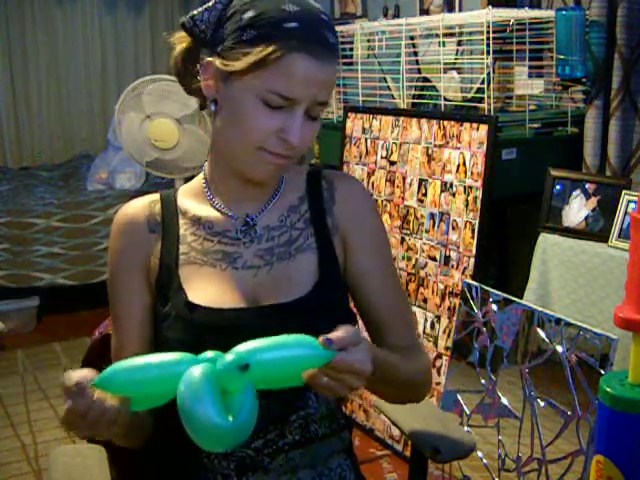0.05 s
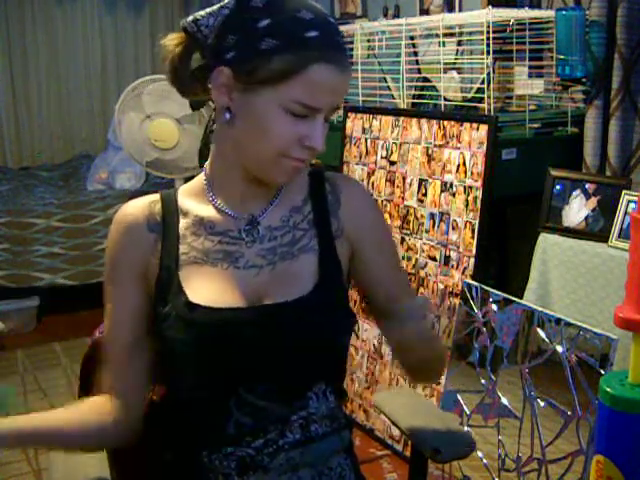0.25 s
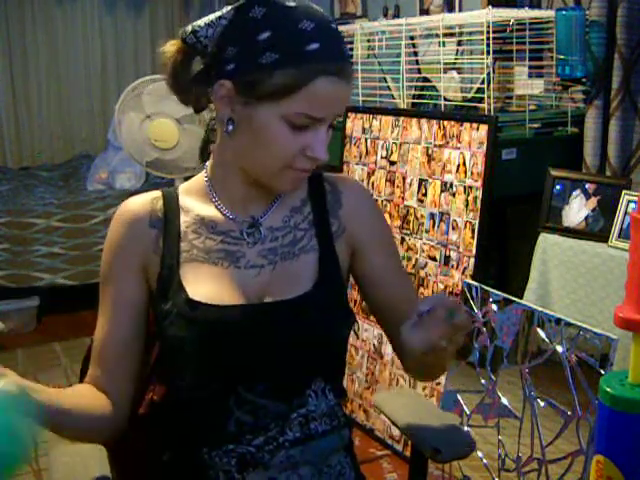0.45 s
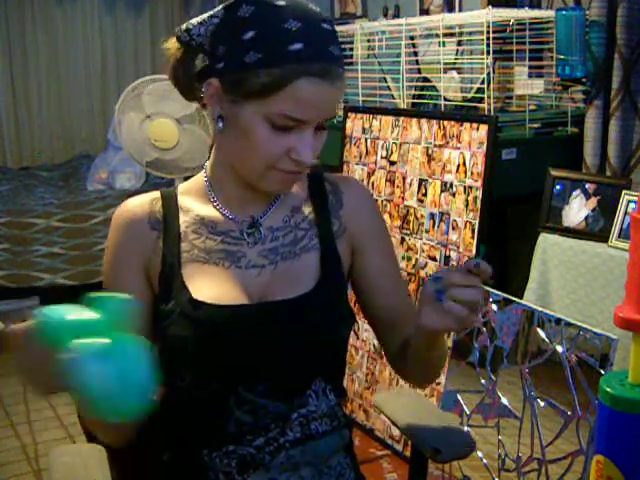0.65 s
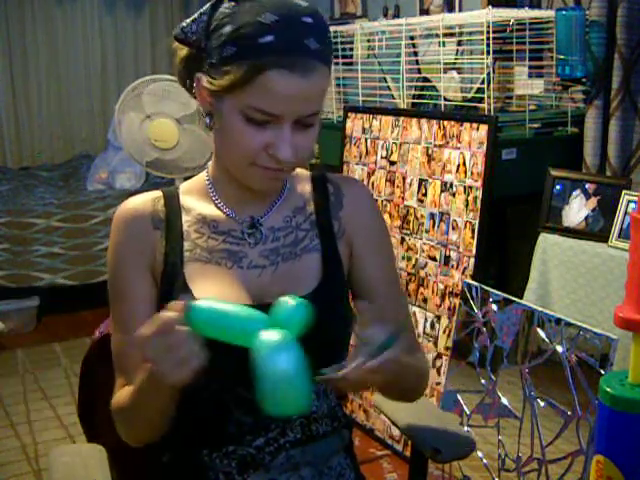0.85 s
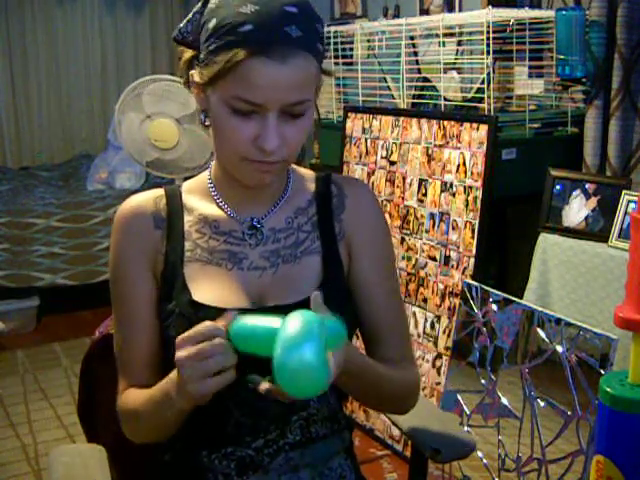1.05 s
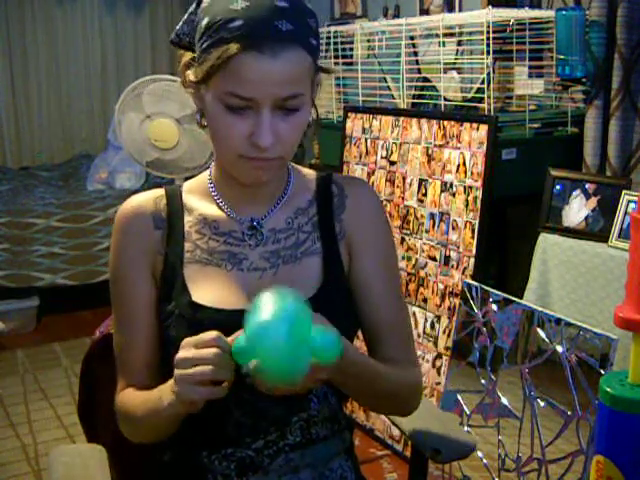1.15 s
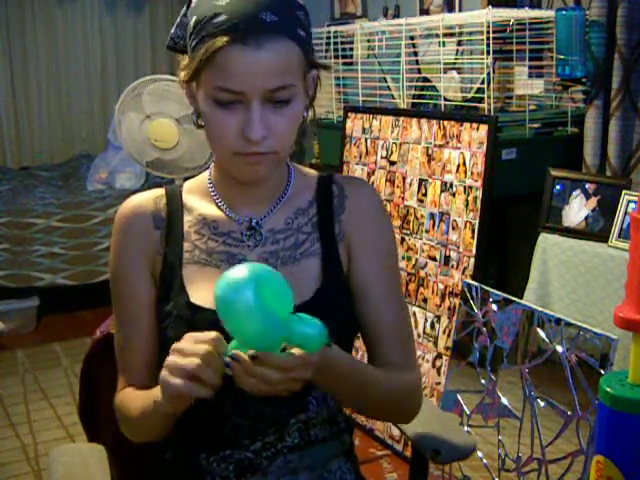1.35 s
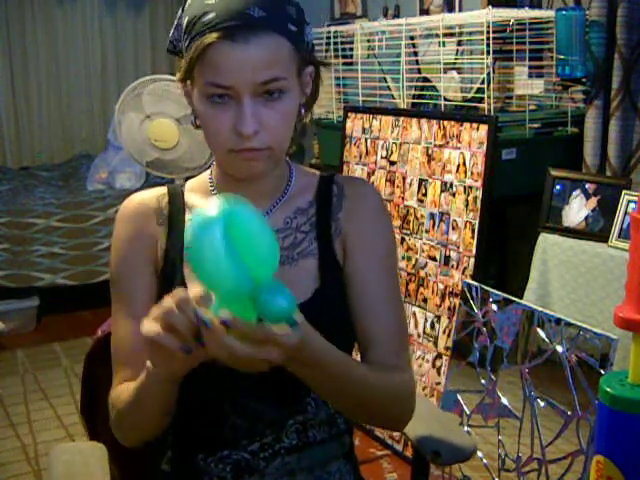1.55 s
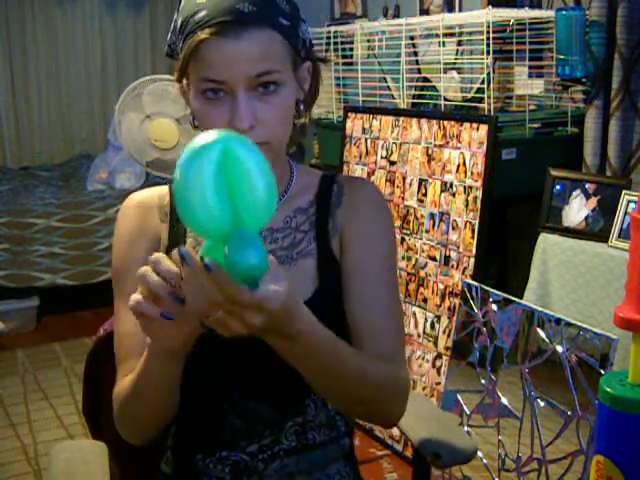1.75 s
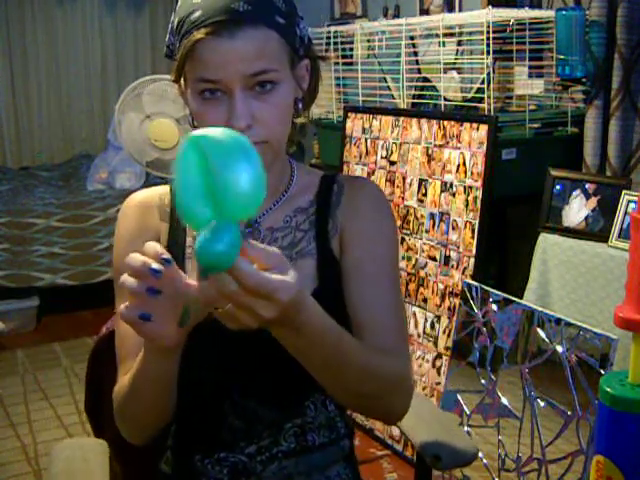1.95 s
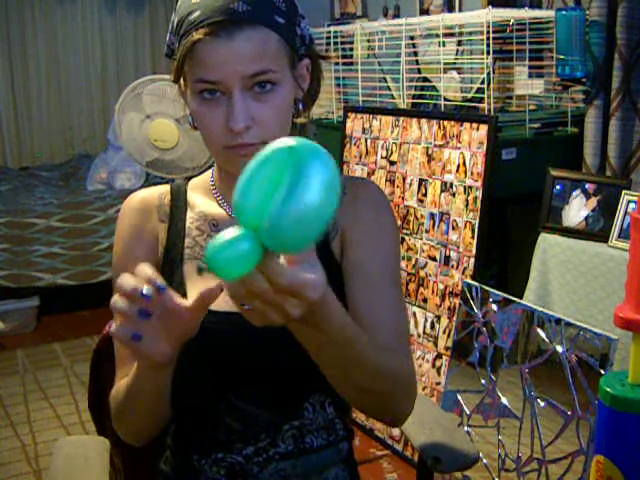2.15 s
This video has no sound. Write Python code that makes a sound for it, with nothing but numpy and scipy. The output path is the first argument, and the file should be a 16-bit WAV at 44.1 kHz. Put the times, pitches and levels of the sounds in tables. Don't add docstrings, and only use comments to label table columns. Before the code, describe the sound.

Loud balloon pop after a brief rubbery creak, then faint ticks, soft pats and a short squeak

```python
import sys
import numpy as np
from scipy import signal
from scipy.fft import rfft, irfft
from scipy.io import wavfile
from scipy.ndimage import uniform_filter1d

SR = 44100
rng = np.random.default_rng(int(sys.argv[2]) if len(sys.argv) > 2 else 0)


def store_wav(level_fs):
    pcm = np.round(np.clip(np.atleast_2d(level_fs), -1, 1) * 32767)
    wavfile.write(sys.argv[1], SR, pcm.T.astype(np.int16))


def decibels_to_gain(level_db):
    exponent = np.asarray(level_db, float) / 20
    return 10 ** exponent


N = 97020
EVENT_LEN = 9000


def level(x, db):
    return x * decibels_to_gain(db) / np.sqrt(np.mean(x ** 2))


def curve(table, col, outside=None):
    rows = np.array(table)
    return np.interp(np.arange(N) / SR, rows[:, 0], rows[:, col], left=outside, right=outside)


def across(table, hz):
    rows = np.array(table)
    return np.interp(np.log(hz), np.log(rows[:, 0]), rows[:, 1])


def walk(rate_hz):
    k = int(SR / rate_hz)
    steps = np.repeat(rng.standard_normal(N // k + 1), k)
    return 1.3 * uniform_filter1d(uniform_filter1d(steps, k), k)[:N]


def fade(t60_s, size=EVENT_LEN):
    return np.exp(-np.log(1000) * np.arange(size) / SR / t60_s)


def add(track, s, x):
    i = int(s * SR)
    track[i:i + len(x)] += x[:N - i]


def ring(hz, t60_s, sag_per_s=0):
    t = np.arange(EVENT_LEN) / SR
    cycles = hz * np.cumsum(1 / (1 + sag_per_s * t)) / SR
    return fade(t60_s) * np.sin(2 * np.pi * cycles)


def steep(noise, hz, width_hz):
    edges_hz = [hz - width_hz / 2, hz + width_hz / 2]
    shape = signal.butter(2, edges_hz, "band", fs=SR, output="sos")
    return level(signal.sosfilt(shape, noise), 0)


def floor():
    # f/Hz, density/dB
    fan = [(15, -11.5), (25, 1), (65, -7), (129, -16), (506, -11), (1690, -23), (2300, -22), (4600, -27.5)]
    # t/s, lift over the floor/dB
    rustle = [(.6, 1), (.85, -0.5), (.95, -0.5), (1.15, 1), (1.4, 0.25), (1.55, 3.5), (1.7, 0), (1.8, 6.5),
              (2.0, -0.5)]
    # t/s, level/dB
    settle = [(0, 3.5), (.3, 3), (.65, -8), (.9, 1.5), (1.7, -3), (2.0, 4.5), (2.2, 5.5)]
    fan_db, hum_hz, hum_db = -49.5, 59, -54.5
    lift_db, low_db = curve(rustle, 1), curve(settle, 1)
    wash = 0
    for hz in 22 * 2 ** np.arange(0, 7.9, 1 / 3):
        db = across(fan, hz) + 0.87 * walk(4) + lift_db * min(hz / 400, 1) + low_db * (hz < 110)
        wash = wash + steep(rng.standard_normal(N), hz, hz / 4) * decibels_to_gain(db) * np.sqrt(hz)
    hum = np.sin(2 * np.pi * hum_hz * np.arange(N) / SR)
    return level(wash, fan_db) + hum * decibels_to_gain(hum_db + low_db + 1.5 * walk(5.5))


def room():
    # f/Hz, density/dB
    colour = [(40, -33.5), (110, -18.5), (300, -12.5), (700, 0.5), (1100, -9), (1500, -10), (2250, -8.5),
              (3600, -15.5)]
    # f/Hz, t60/s
    decay = [(100, .24), (300, 0.14), (700, 0.24), (1500, 0.18), (2500, 0.19), (4000, 0.2)]
    size, tail = 20000, 0
    for hz in 50 * 2 ** np.arange(0, 6.6, 1 / 3):
        noise = steep(rng.standard_normal(size), hz, hz / 4)
        tail = tail + noise * decibels_to_gain(across(colour, hz)) * np.sqrt(hz) * fade(across(decay, hz), size)
    return tail / np.sqrt(np.sum(tail ** 2))


def creak():
    # t/s, level/dB
    pull = [
        (0, -36.5),
        (.06, -37),
        (.13, -35.5),
        (.195, -32.5),
        (.215, -35),
        (.227, -36.5),
        (.24, -39.5),
    ]
    # f/Hz, width/Hz, level/dB
    modes = [(156, 60, -5), (540, 280, 4), (900, 400, -5), (1450, 500, -11), (2250, 700, -6),
             (3100, 600, -9.5), (3650, 400, -12)]
    slips_per_s, scatter_db = 2500, 2
    slips = (rng.random(N) < slips_per_s / SR) * rng.standard_normal(N)
    body = sum(decibels_to_gain(db + scatter_db * walk(64)) * steep(slips, hz, width_hz) for hz, width_hz, db in modes)
    hiss = decibels_to_gain(-12) * steep(slips, 3800, 4200)
    return level(body + hiss, 0) * decibels_to_gain(curve(pull, 1, -92.5))


def ticks():
    # t/s, peak/dB, pitch f/Hz
    snaps = [(.4578, -21, 2800), (.464, -29, 2600), (.4775, -21, 3100), (.484, -32, 2600),
             (.5385, -30, 3200), (.588, -27, 2800), (.594, -37, 2600), (1.645, -43, 2200),
             (1.772, -38, 3100), (1.774, -33, 2000), (1.814, -29, 3300), (1.8165, -25, 2100),
             (1.818, -26, 3800)]
    t60_s, rise_s, gain = .0065, .003, 2.4
    width_hz, tail_gain, tail_t60_s = 1900, 0.07, 0.078
    out = np.zeros(N)
    for s, db, hz in snaps:
        snap = ring(hz, t60_s) * (1 - fade(rise_s))
        tail = steep(rng.standard_normal(EVENT_LEN), hz, width_hz) * fade(tail_t60_s)
        add(out, s, decibels_to_gain(db) * (gain * snap + tail_gain * tail))
    return out


def pats():
    # t/s, peak/dB, pitch f/Hz
    touches = [(.9395, -29.5, 360), (0.947, -34, 260), (.955, -27.5, 470), (.962, -41, 390),
               (.977, -42.5, 780), (1.0135, -29.5, 260), (1.032, -32.5, 298), (1.062, -42, 496),
               (1.552, -36.5, 620), (1.772, -28.5, 748), (1.82, -22.5, 748), (1.847, -32.5, 120)]
    t60_s, rise_s, skin_db = 0.012, 0.0029, -19
    out = np.zeros(N)
    for s, db, hz in touches:
        noise = rng.standard_normal((2, EVENT_LEN))
        hollow = ring(hz, t60_s) + 0.24 * steep(noise[0], 0.95 * hz, hz) * fade(0.077)
        skin = decibels_to_gain(skin_db) * steep(noise[1], 2800, 2200) * fade(0.055)
        add(out, s, decibels_to_gain(db) * (1 - fade(rise_s)) * (1.52 * hollow + skin))
    return out


def squeak():
    # t/s, level/dB, slip rate f/Hz
    rub = [
        (1.828, -40, 1104),
        (1.838, -25, 1116),
        (1.85, -15.5, 1089),
        (1.855, -25.5, 1055),
        (1.871, -25, 978),
        (1.883, -21.5, 1068),
        (1.897, -20, 1154),
        (1.903, -32.5, 1181),
        (1.93, -36, 1210),
    ]
    # multiple of slip rate, start level/dB, end level/dB
    partials = [(.5, -9.5, -35), (1, -0.5, -2), (2, -6, 4), (3, -8.5, 2.5)]
    jitter, flutter_db, rasp_db = .04, 2.5, 2.5
    bite, bite_from_db = .5, -18
    phase = 2 * np.pi * np.cumsum(curve(rub, 2) * (1 + jitter * walk(300))) / SR
    start_s, end_s = rub[0][0], rub[-2][0]
    along = np.clip((np.arange(N) / SR - start_s) / (end_s - start_s), 0, 1) ** 2
    press_db = curve(rub, 1) - bite_from_db
    tone = 0
    for k, start_db, end_db in partials:
        db = start_db + (end_db - start_db) * along
        db = db + max(k - 1, 0) * bite * press_db + flutter_db * walk(150)
        tone = tone + decibels_to_gain(db) * np.sin(k * phase)
    rasp = steep(rng.standard_normal(N), 4400, 4400) * decibels_to_gain(rasp_db + walk(200))
    low_rasp = decibels_to_gain(-8) * steep(rng.standard_normal(N), 754, 760)
    return (tone + 0.41 * rasp + low_rasp) * decibels_to_gain(curve(rub, 1, -70))


def bursts():
    # t/s, level/dB, ring f/Hz, ring t60/s, crack/dB
    chambers = [
        (.2392, 17.5, 653.7, 0.057, -22),
        (.2705, 11.5, 726.6, .05, -11.5),
        (.2772, -1, 615, .04, 9),
        (.287, -2.5, 648, .04, 1),
        (.302, 4, 752, 0.051, -6.5),
    ]
    crack_hz, crack_width_hz, crack_t60_s = 2780, 2800, 0.037
    thump_hz, thump_db, sag_per_s = 158.5, -21, 23.7
    boom_hz, boom_width_hz, boom_db = 569, 525, -10
    slap_db, boom_room_db = 6, -17
    out, slap = np.zeros(N), np.zeros(N)
    for s, db, hz, t60_s, crack_db in chambers:
        noise = rng.standard_normal((2, EVENT_LEN))
        crack = steep(noise[0], crack_hz, crack_width_hz) * fade(crack_t60_s)
        boom = steep(noise[1], boom_hz, boom_width_hz) * fade(1.7 * t60_s)
        air = ring(hz, t60_s, sag_per_s) + decibels_to_gain(thump_db) * ring(thump_hz, .08)
        add(out, s, decibels_to_gain(db) * (decibels_to_gain(boom_db) * boom - air + decibels_to_gain(crack_db) * crack))
        flat_slap = decibels_to_gain(crack_db + slap_db) * noise[0] * fade(0.005)
        add(slap, s, decibels_to_gain(db) * (flat_slap + decibels_to_gain(boom_room_db + boom_db) * boom))
    return out, slap


def scene():
    tick_wet_db, hand_wet_db = -19, -13.5
    pop, slap = bursts()
    snaps, hands, echo = ticks(), pats() + squeak(), room()
    bright = signal.lfilter([1, -.9], [1], echo)
    bright = bright / np.sqrt(np.sum(bright ** 2))
    send = decibels_to_gain(tick_wet_db) * snaps + decibels_to_gain(hand_wet_db) * hands
    wet = signal.fftconvolve(slap, echo)[:N] + signal.fftconvolve(send, bright)[:N]
    return (pop + snaps + hands + wet + creak() + floor())[None]


def roll_off(x):
    return signal.sosfilt(signal.butter(12, 16470, fs=SR, output="sos"), x)


def record(dry):
    # f/Hz, gain/dB
    passband = [(20, -0.5), (3650, 0.5), (3850, -3), (4020, -12.5), (4200, -12), (4450, -23), (4600, -45),
                (4750, -95.5)]
    overload, ceiling = .68, .708
    x = np.clip(dry, -overload, overload)
    gain_db = across(passband, np.fft.rfftfreq(N, 1 / SR) + 1)
    x = irfft(rfft(x) * decibels_to_gain(gain_db), N)
    return roll_off(np.clip(x, -ceiling, ceiling))


dry = scene()
out = record(dry)
store_wav(out)
```